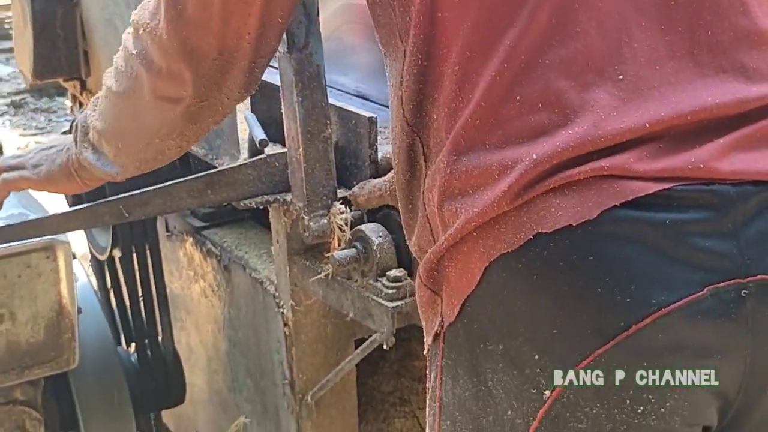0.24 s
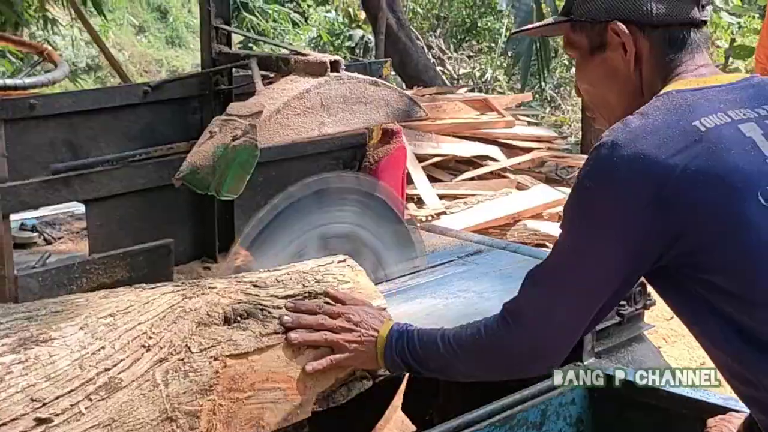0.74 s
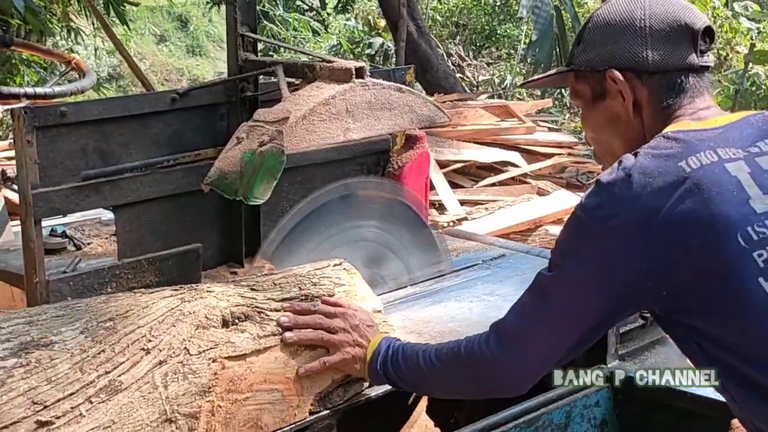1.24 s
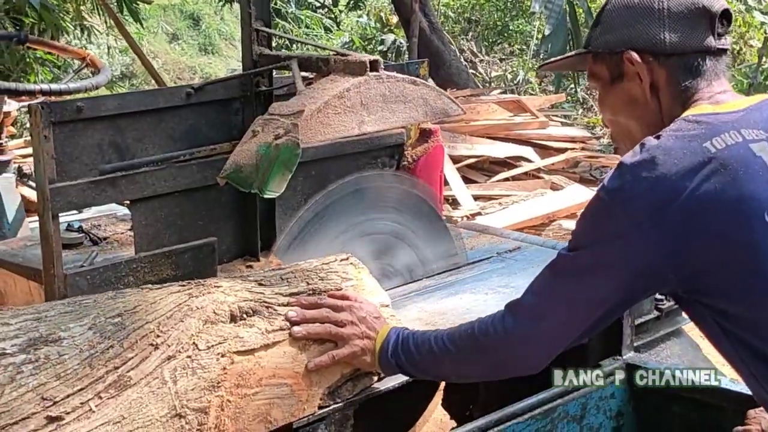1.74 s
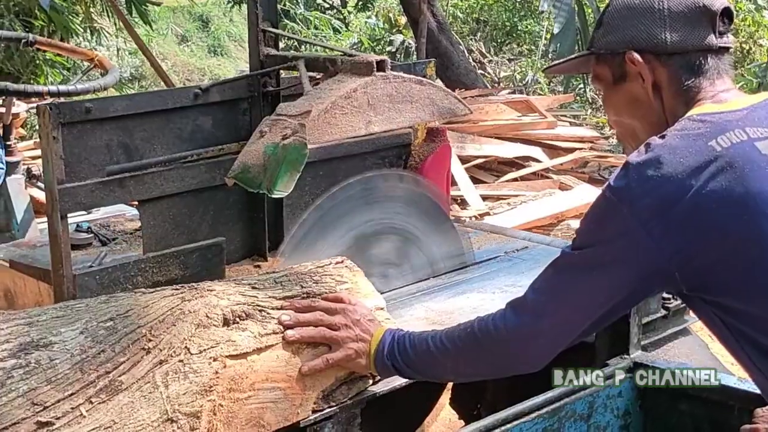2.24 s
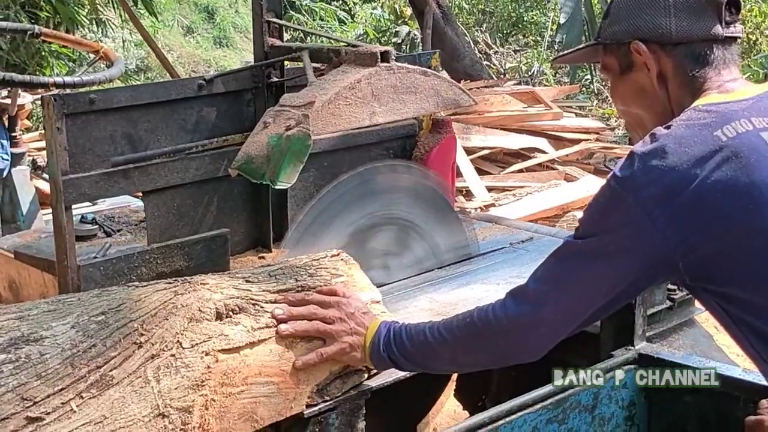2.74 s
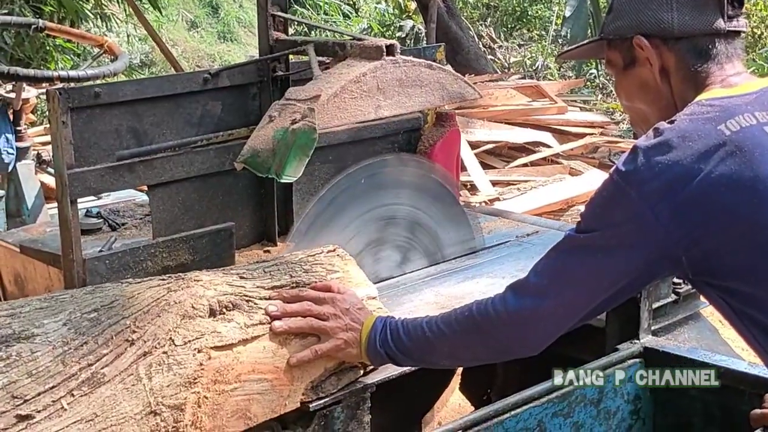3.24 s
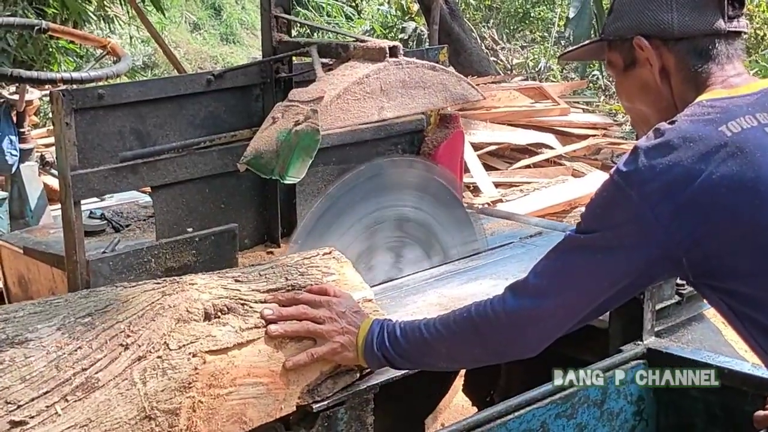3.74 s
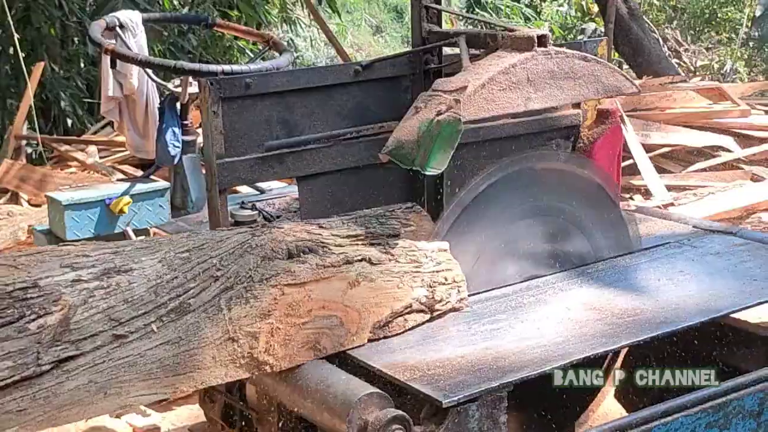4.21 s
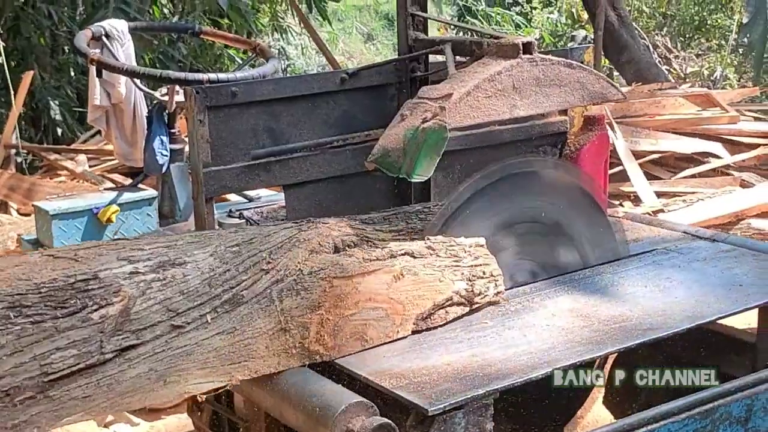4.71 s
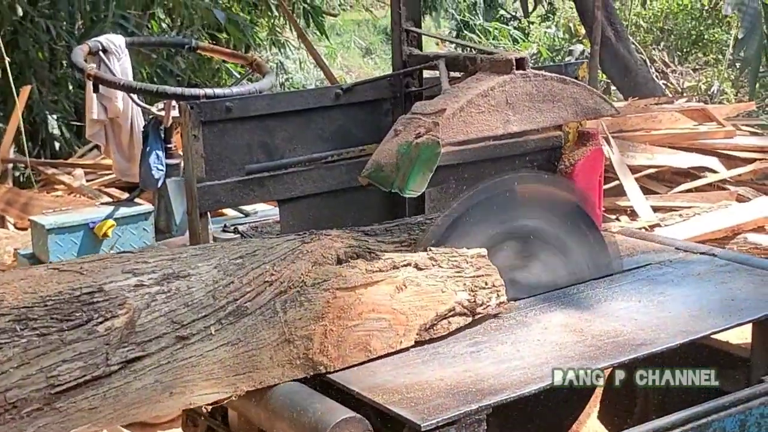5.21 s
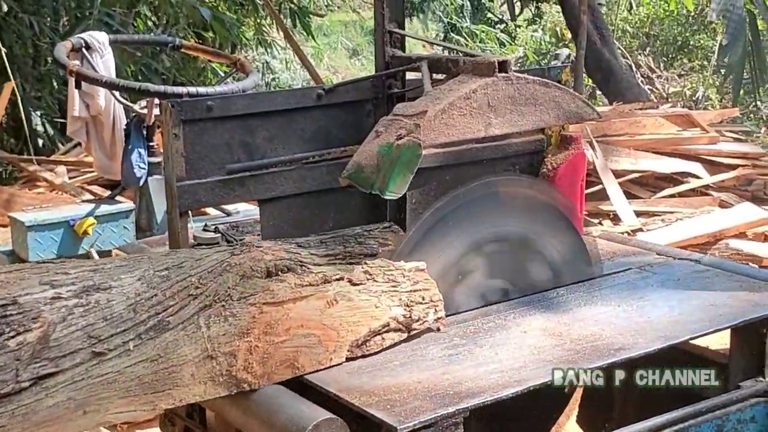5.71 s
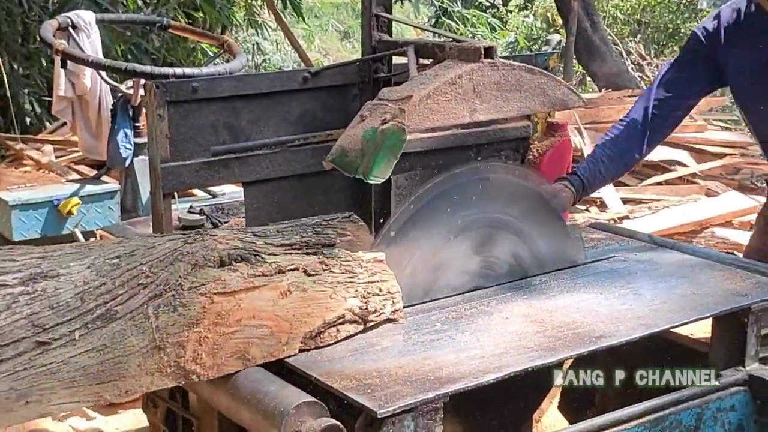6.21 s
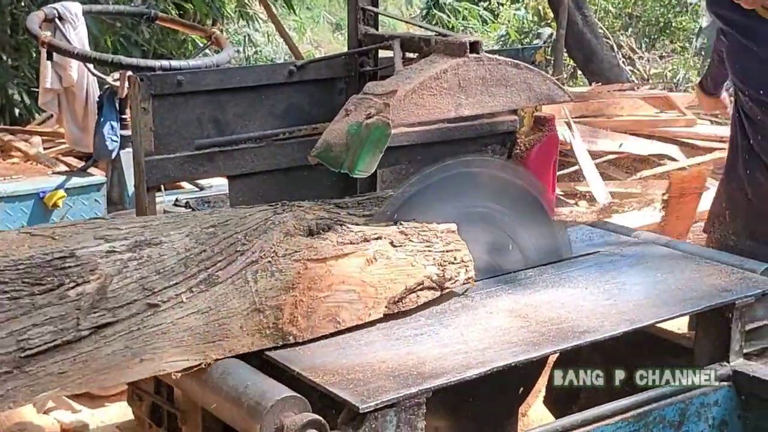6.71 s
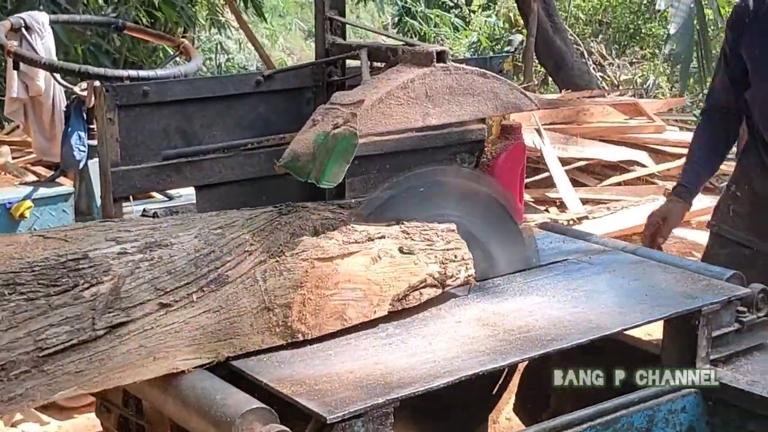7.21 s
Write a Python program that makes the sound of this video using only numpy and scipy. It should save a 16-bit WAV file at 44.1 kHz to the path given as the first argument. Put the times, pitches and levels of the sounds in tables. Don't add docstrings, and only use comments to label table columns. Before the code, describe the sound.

Close outdoors, a single-cylinder diesel pops about fourteen times a second over rumble and clatter, and a slipping belt briefly sings. The microphone backs off as a log meets the blade with a jolt; ripping grows into a bright, coarse rasp. After a jump to a second spot there is more airy hiss, metal knocks and sharp ticks, and the cut weakens before picking up again.

```python
import sys
import numpy as np
from scipy import signal
from scipy.fft import rfft, irfft, dct, next_fast_len
from scipy.io import wavfile
from scipy.ndimage import uniform_filter1d

SR = 44100
rng = np.random.default_rng(int(sys.argv[2]) if len(sys.argv) > 2 else 0)


def invert_db(x):
    u = np.asarray(x, float) / 20
    return 10 ** u


def digitize_waveform(pressure):
    field = np.atleast_2d(pressure).T
    bounded = np.clip(field, -1, 1)
    quanta = np.round(bounded * 32767).astype(np.int16)
    wavfile.write(sys.argv[1], SR, quanta)


N = 328986
HZ = np.fft.rfftfreq(next_fast_len(N), 1 / SR) + 1e-3
MOVE_S = 3.82

# (time [s], fuel effort as pop peak [dB], frame shake [dB])
ENGINE_EFFORT = [(0.0, -11, -28.5), (0.37, -11.5, -27.5), (0.7, -10, -33.5), (0.95, -9.5, -27),
                 (1.08, -17, -36.5), (1.3, -11, -30.5), (1.45, -10.5, -29), (1.7, -18.5, -32.5),
                 (2.38, -13.5, -33.5), (2.5, -13.5, -39), (3.1, -16.5, -41.5), (3.5, -20, -38.5),
                 (3.9, -15.5, -38.5), (4.45, -14.5, -36), (5.1, -11, -35), (6.0, -14, -38),
                 (6.7, -16.5, -34.5), (7.46, -17.5, -38.5)]


def rms_one(x):
    return x / np.sqrt(np.mean(x ** 2) + 1e-20)


def in_time(rows):
    s, *columns = np.transpose(rows)
    return [np.interp(np.arange(N) / SR, s, c) for c in columns]


def at_hz(points):
    hz, value = np.transpose(points)
    return np.interp(np.log(HZ), np.log(np.maximum(hz, 1)), value)


def drift(rate):
    r = np.exp(-80 * np.pi * rate / SR)
    noise = rng.standard_normal(N // 40 + 2002)
    slow = signal.lfilter([1], [1, -2 * r, r * r], noise)[2000:]
    return np.interp(np.arange(N) / 40, np.arange(len(slow)), rms_one(slow))


def grains(per_s, spread_db):
    size = invert_db(spread_db * np.minimum(rng.exponential(1, (2, N)), 4))
    sign = rng.choice([-1, 1], (2, N))
    return size * sign * (rng.random((2, N)) < per_s / SR)


def burst(at_s, heights, hz, spread_s, rise=1):
    t = np.arange(-2000, 2001) / SR
    clicks = np.zeros(N + SR)
    clicks[np.clip(np.round(at_s * SR).astype(int), 0, None)] = heights
    bell = np.exp(-(t / (spread_s * np.where(t < 0, rise, 1))) ** 2)
    return signal.fftconvolve(clicks, np.cos(2 * np.pi * hz * t) * bell, "same")[:N]


def body(drive, spectrum, peaks, patchy_db, patch_rate, lead_s, count):
    # (frequency [Hz], side over mid [dB])
    width_curve = [(30, -34), (85, -31), (180, -28), (350, -19), (700, -14), (1400, -7), (2800, -3),
                   (5600, -1), (9000, -4), (15000, -2.5)]
    # (frequency [Hz], left over right [dB])
    balance_curve = [(300, 0), (600, -.3), (1400, .2), (2800, .5), (5600, .3), (9000, 1), (14000, -1.2)]
    lift_db = sum(db / (1 + (2 * (HZ - hz) / width) ** 2) for hz, width, db in peaks)
    direct, scattered = rfft(drive, next_fast_len(N)) * invert_db(at_hz(spectrum) + lift_db)
    lead = np.exp(1j * np.pi * HZ * lead_s)
    side = scattered * invert_db(at_hz(width_curve))
    sound = np.array([direct * lead + side, direct / lead - side])
    sound = sound * invert_db(at_hz(balance_curve) * [[.5], [-.5]])
    place = np.interp(np.log(HZ), np.log([spectrum[0][0], spectrum[-1][0]]), [0, count - 1])
    out = 0
    for k in range(count):
        share = np.clip(1 - np.abs(place - k), 0, 1)
        band = irfft(sound * share, next_fast_len(N))[:, :N]
        out = out + band * invert_db(patchy_db * drift(patch_rate))
    return out / np.sqrt(np.mean(out.mean(axis=0) ** 2))


def strikes(rows, t60, lag):
    t = np.arange(int(t60 * SR)) / SR
    out = np.zeros(N + SR)
    for (s, db, hz), (detune, phase) in zip(rows, rng.random((len(rows), 2))):
        second_hz = hz * (.94 + .12 * detune)
        pair = np.sin(2 * np.pi * hz * t) + .6 * np.sin(2 * np.pi * (second_hz * t + phase))
        out[int(s * SR):][:len(t)] += invert_db(db - 60 * t / t60) * np.minimum(t / .003, 1) * pair
    return np.array([out[:N], np.roll(out, lag)[:N]])


def after_move():
    return np.clip((np.arange(N) / SR - MOVE_S) / .02, 0, 1)


def recolour(x, change, share):
    other = irfft(rfft(x, next_fast_len(N)) * invert_db(at_hz(change)), next_fast_len(N))[:, :N]
    return x + share * (other - x)


def firings():
    # (firing number, time [s], governor swings so far)
    crank_pace = [(0, -.004, .03), (3, .2154, .41), (18, 1.2913, 6.68), (22, 1.5784, 7.91),
                  (31, 2.2294, 12.66), (34, 2.4452, 13.53), (40, 2.8791, 16.33), (49, 3.5284, 19.67),
                  (54, 3.8753, 20.54), (60, 4.3251, 22.56), (67, 4.8701, 25.78), (68, 4.9429, 27.07),
                  (76, 5.5296, 28.44), (83, 6.0427, 31.82), (85, 6.1778, 32.7), (96, 6.9958, 36.27),
                  (99, 7.2262, 37.72), (102, 7.4557, 38.44)]
    # (firing number, lateness [ms])
    stray_firings = [(3, -4), (5, 5), (6, 4), (11, 6), (16, 3), (17, 3), (20, 2), (32, 2), (34, 3),
                     (57, -2), (77, -4), (82, -4), (92, -4)]
    hunt_s = .00404
    number, s, swings = np.transpose(crank_pace)
    k = np.arange(number[-1] + 1)
    late_ms = sum(ms * (k == stray) for stray, ms in stray_firings)
    hunting = hunt_s * np.cos(2 * np.pi * np.interp(k, number, swings))
    return np.interp(k, number, s) + hunting + late_ms / 1000


def engine():
    # (frequency [Hz], level [dB per Hz])
    rumble_curve = [(12, -39), (20, 3), (65, -1.5), (113, -0.5), (200, 0), (260, -46), (440, -120)]
    # (frequency [Hz], level [dB per Hz])
    boom_curve = [(76, -52), (130, -6), (312, -2.5), (342, -1), (454, -6), (480, -19.5), (620, -33),
                  (1060, -120)]
    # (frequency [Hz], level [dB per Hz])
    clatter_curve = [(260, -27.5), (450, 9.5), (621, -5), (704, -1.5), (1020, -7.5), (1320, -7.5),
                     (1500, -13), (2640, -13.5), (3680, -11), (5690, -21), (7000, -36), (9100, -51),
                     (15400, -120)]
    # (frequency [Hz], width [Hz], lift [dB])
    casing_modes = [(73, 12, 3), (249, 14, 7), (323, 14, 6), (709, 60, 2), (1313, 50, 5), (1658, 45, 5)]
    effort_db, rumble_db = in_time(ENGINE_EFFORT)
    swing_db = effort_db + 12
    boom_db = -30 + 0.99 * swing_db + 2 * after_move()
    clatter_db = -26.5 + 0.6 * swing_db + 1.06 * after_move()
    s = firings()

    compression = burst(s - .016, invert_db(rng.normal(0, 1.0, len(s))), hz=74.3, spread_s=0.011)
    rock_back = burst(s - .0025, .5, hz=74.0, spread_s=0.012)
    push = rms_one(compression + rock_back)

    swell = 1.7 + burst(s - .016, 1.0, hz=0, spread_s=0.069) + burst(s + 0.025, 0.04, hz=0, spread_s=0.0026)
    rumble = body(rng.standard_normal((2, N)) * swell, rumble_curve, casing_modes,
                  patchy_db=4.5, patch_rate=0.25, lead_s=0, count=2)

    lull = 1 - 0.15 * burst(s + 0.0021, 1.0, hz=0, spread_s=0.004)
    boom = lull * body(grains(900, 1.4), boom_curve, casing_modes,
                       patchy_db=0.5, patch_rate=8.3, lead_s=0, count=2)

    knock = 1 + burst(s, .3, hz=0, spread_s=.003) + burst(s + .038, .5, hz=0, spread_s=.004)
    clatter = body(grains(5000, 2.1) * knock, clatter_curve, casing_modes,
                   patchy_db=0.57, patch_rate=11.0, lead_s=0, count=6)

    low = invert_db(-2.5) * push + invert_db(-2.5) * rumble
    return invert_db(rumble_db) * low + invert_db(boom_db + 2.0) * boom + invert_db(clatter_db + 3.5) * clatter


def exhaust():
    # (time [s], loss [dB])
    lean_firings = [(0.0, -1), (1.008, 4), (1.368, 6), (1.504, 9), (1.648, 4), (2.307, 3), (2.732, 2),
                    (2.95, 3), (3.39, 4), (3.529, 9), (4.026, 3), (4.32, 6), (4.564, 6), (4.716, 5),
                    (4.79, 3), (4.871, 8), (4.945, 8), (5.156, 3), (5.237, 3), (5.317, 8), (5.527, 11),
                    (5.673, 3), (5.967, -3), (6.48, 6), (6.55, 8), (6.845, 9), (6.924, 5), (7.075, 10)]
    s = firings()
    db = np.interp(s, *np.transpose(ENGINE_EFFORT)[:2])
    db = db + rng.normal(0, 1.0, len(s)) + 1.2 * (s > MOVE_S)
    for lean_s, loss_db in lean_firings:
        db[np.argmin(np.abs(s - lean_s))] -= loss_db
    pop = burst(s, invert_db(db - 2.3), hz=283, spread_s=.0042, rise=.82)
    back = burst(s + .0183, -invert_db(db - 9.5), hz=170, spread_s=.0018)
    return pop + back


def bench():
    # (time [s], pitch [Hz], level [dB])
    belt_song = [
        (.05, 722, -38),
        (.14, 728, -32),
        (.25, 735, -26.5),
        (.34, 718, -30),
        (.48, 667, -38),
        (.55, 670, -44),
    ]
    # (frequency [Hz], level [dB], t60 [s])
    bench_modes = [(700, -21, 0.25), (1330, -23.5, 0.2), (2070, -24, .1), (4950, -27, 0.044)]
    # (time [s], peak [dB], pitch [Hz])
    pipe_rings = [(0.067, -12, 249), (0.137, -16, 294), (0.206, -15, 299), (0.282, -14, 305),
                  (0.36, -21, 260), (0.428, -16, 258), (0.501, -14, 245), (0.644, -12.5, 256),
                  (0.712, -14, 335), (0.854, -12, 250), (0.924, -12, 246), (1.149, -18, 245),
                  (1.286, -16, 250), (2.011, -13, 288), (2.438, -16, 302), (2.516, -14, 255),
                  (2.725, -20, 248), (3.087, -22, 258), (3.234, -19, 293), (3.736, -21, 293),
                  (4.246, -16, 247), (4.399, -17, 283), (4.475, -17, 310), (5.084, -13, 326),
                  (5.383, -12, 256), (5.817, -21, 251), (5.894, -13, 328), (5.961, -17, 248),
                  (6.04, -13, 324), (6.171, -18, 258), (6.25, -15.5, 247), (6.316, -11, 253),
                  (6.395, -20, 310), (6.615, -14, 276), (7.221, -20, 277), (7.305, -18, 285)]
    # (time [s], peak [dB], pitch [Hz])
    metal_knocks = [(0.139, -20, 732), (0.544, -23, 891), (0.609, -21, 700), (0.682, -21.5, 910),
                    (0.768, -20.5, 710), (0.905, -24.5, 735), (0.979, -19, 1316), (1.564, -12.5, 720),
                    (1.629, -16, 1100), (2.043, -21, 686), (2.33, -14, 767), (2.472, -21, 686),
                    (4.133, -16, 869), (4.5, -12, 740), (4.575, -20, 730), (4.668, -13, 773),
                    (4.742, -20, 735), (4.823, -18, 772), (4.892, -14, 732), (5.001, -22.5, 866),
                    (5.122, -15, 774), (5.226, -18, 710), (5.272, -14, 716), (5.491, -13, 726),
                    (5.559, -24, 715), (5.92, -24, 890), (6.026, -10, 699), (6.346, -16, 680),
                    (6.88, -25, 1043), (7.1, -19, 775)]
    # (time [s], peak [dB], pitch [Hz])
    tooth_ticks = [(0.0707, -17, 3000), (0.2828, -10, 3610), (0.3257, -14, 3700), (0.4908, -19, 3630),
                   (0.5496, -13, 4300), (0.7741, -15, 3660), (0.9777, -10, 3400), (1.023, -2, 4450),
                   (1.1233, -15, 3870), (1.1977, -21, 3540), (1.4132, -19, 3400), (2.5463, -11, 4080),
                   (3.5184, -6, 3320), (3.678, -15, 4000), (4.2098, -3, 3970), (4.4657, -12, 4100),
                   (4.6937, -11, 4030), (4.7157, -17, 3990), (4.8234, -24, 3700), (4.8609, -18, 4090),
                   (4.9931, -18, 3880), (5.0634, -14, 4020), (5.2934, -17, 3870), (5.6466, -14, 4430),
                   (5.7867, -11, 3450), (5.8167, -13, 4260), (5.9224, -24, 3400), (6.2442, -14, 3930),
                   (6.3699, -17, 4180), (6.6094, -7, 4240), (6.8937, -7, 4200), (6.9691, -2, 3700),
                   (7.1232, -17, 4120), (7.2305, -15, 4010), (7.2644, -2, 3930)]
    jolt_s = .98
    t = np.arange(N) / SR
    hz, db = in_time(belt_song)
    slipping = (t > belt_song[0][0]) & (t < belt_song[-1][0])
    belt = invert_db(db - 1 + 1.8 * drift(18.0)) * np.sin(2 * np.pi * np.cumsum(hz) / SR) * slipping
    jolt = sum(strikes([(jolt_s, db, hz)], t60, lag=0) for hz, db, t60 in bench_modes)
    pipe = invert_db(-9) * strikes(pipe_rings, t60=.2, lag=0)
    metal = invert_db(-6) * strikes(metal_knocks, t60=0.068, lag=1)
    ticks = invert_db(-9) * strikes(tooth_ticks, t60=0.029, lag=-2)
    return belt + jolt + pipe + metal + ticks


def dust():
    # (time [s], length [s], level [dB])
    sawdust_sprays = [
        (0.0, .33, -56),
        (1.0, .08, -55),
        (3.3, .5, -56),
        (3.81, .25, -39),
        (4.03, .6, -37),
        (5.4, .45, -47),
        (6.0, .3, -46),
        (6.33, .08, -36),
        (6.36, 1.1, -38),
    ]
    rise_s, fade_s = 0.012, 0.14
    t = np.arange(N) / SR
    power = invert_db(-56 + 9.5 * after_move() + 1.2 * drift(19.0)) ** 2
    gusts = invert_db(1.5 * drift(12.0))
    for s, length, db in sawdust_sprays:
        shape = np.clip((t - s) / rise_s, 0, 1) * np.exp(-np.clip(t - s - length, 0, None) / fade_s)
        power = power + (invert_db(db) * shape) ** 2
    return np.sqrt(power) * gusts


def knots():
    # (time [s], length [s], lift [dB])
    hard_knots = [(0.32, 0.03, 5.5), (0.543, 0.04, 8), (0.591, 0.04, 4.5), (0.769, 0.049, 4.5),
                  (0.982, 0.13, 3), (1.064, 0.0083, 6), (1.12, 0.028, 3), (1.471, 0.027, 5),
                  (1.618, 0.027, -1.5), (2.062, 0.048, 0.5), (2.284, 0.057, -0.5), (2.585, 0.1, 1),
                  (2.805, 0.028, 0.5), (3.064, 0.13, 1.5), (3.268, 0.015, 1), (3.865, 0.15, 0),
                  (4.201, 0.043, -2), (4.572, 0.036, 3), (4.731, 0.032, 4.5), (4.819, 0.012, 5.5),
                  (5.064, 0.013, 8), (5.211, 0.014, 5.5), (5.436, 0.065, 3), (5.78, 0.096, 3),
                  (6.215, 0.053, 0), (6.326, 0.051, 3.5), (6.706, 0.031, 3), (6.781, 0.052, 4),
                  (7.251, 0.028, 0.5)]
    # (time [s], length [s], lift [dB])
    bark_snag = (1.023, 0.011, 5.6)
    # (time [s], length [s], loss [dB])
    soft_pockets = [(1.784, 0.081, 1.5), (2.26, 0.019, 4), (2.424, .023, 3), (2.688, 0.048, 0.5),
                    (3.728, 0.066, 2), (4.05, 0.03, 2.5), (4.7, 0.014, 4), (4.956, .029, 9),
                    (5.035, 0.035, 10), (5.337, 0.027, 2), (5.404, 0.025, 7), (5.895, 0.038, -0.5),
                    (6.053, .018, 1), (6.418, 0.071, 2.5), (7.083, 0.078, 0), (7.377, 0.029, 5)]
    t = np.arange(N) / SR
    rows = list(hard_knots) + [bark_snag] + [(s, length, -db) for s, length, db in soft_pockets]
    load_db = sum(db * ((t >= s) & (t < s + length)) for s, length, db in rows)
    return uniform_filter1d(load_db, size=220)


def saw():
    # (time [s], cutting level [dB])
    log_feed = [(0.0, -33.5), (0.972, -33), (0.984, -26.5), (1.2, -29.5), (1.35, -31.5), (1.62, -21.5),
                (1.83, -25), (2.1, -24), (2.5, -26), (2.7, -24), (3.4, -22.5), (3.76, -25), (4.57, -27.5),
                (4.94, -30.5), (5.8, -26), (5.92, -30.5), (6.4, -24.5), (7.46, -25.5)]
    # (frequency [Hz], level [dB per Hz])
    cut_curve = [(1000, -8.5), (1700, -5), (2060, -4.5), (2630, -5), (2900, -4.5), (4020, 3), (5050, -3.5),
                 (5350, -8), (6220, -12), (6700, -13), (8130, -21), (10000, -21.5), (13000, -62),
                 (22000, -120)]
    # (frequency [Hz], width [Hz], lift [dB])
    blade_modes = [(2018, 50, 3), (2245, 120, 3), (2508, 55, 5), (2806, 55, 5), (3008, 45, 5),
                   (3370, 70, 3), (3590, 60, 4), (3718, 40, 3), (4033, 40, 3), (4484, 60, 4), (4820, 80, 5),
                   (5846, 70, 8), (6913, 100, 3), (7664, 100, 4)]
    # (frequency [Hz], level [dB per Hz])
    hiss_curve = [(3820, -5.5), (6500, -2.5), (6860, -16), (7300, -3), (7910, -18.5), (9350, -10.5),
                  (11400, -14), (13300, -13), (14300, -13), (15500, -20.5)]
    cut_db, = in_time(log_feed)
    bite = invert_db(0.57 * drift(54.0) + 0.44 * drift(20.0))
    cut = body(grains(14000, 1.8) * bite, cut_curve, blade_modes,
               patchy_db=-0.86, patch_rate=10.0, lead_s=2.6e-5, count=5)
    hiss = body(rng.standard_normal((2, N)), hiss_curve, [],
                patchy_db=.5, patch_rate=24.0, lead_s=0, count=5)
    return invert_db(cut_db + knots() - 0.36) * cut + invert_db(3.5) * dust() * hiss


def scene():
    # (frequency [Hz], colour change [dB])
    belt_spot = [(40, -6), (72, -8), (120, 8.5), (190, -4.5), (280, -1), (4000, 0), (6200, 4.5),
                 (9000, 1.5)]
    # (frequency [Hz], colour change [dB])
    shaded_rim = [(120, -2.5), (190, 2), (300, 0), (5500, 1), (7200, -6.5), (9000, -3), (11000, 4.5),
                  (14000, -2.5)]
    # (frequency [Hz], colour change [dB])
    later_spot = [(60, 1), (190, 1), (280, -0.5), (465, 3), (620, -2), (830, 1), (1050, 0), (1330, -2),
                  (1490, -4), (1750, 0.5), (3000, -2), (4500, 0), (7000, 2.5), (9500, -2), (11500, 2),
                  (13500, -5), (15000, 0.5)]
    leave_s, shade_s = .35, 5.99
    t = np.arange(N) / SR
    pops = exhaust()
    pops = np.array([pops, np.roll(pops, 1)])
    here = engine() + saw() + bench() + pops
    here = recolour(here, belt_spot, np.clip((leave_s - t) / .01, 0, 1))
    here = recolour(here, shaded_rim, np.clip((t - shade_s) / 0.2, 0, 1))
    return recolour(here, later_spot, after_move())


def patchy_grain(x):
    # (frequency [Hz], patch depth [dB], mid rms over mid step [dB], mid rms over side step
    # [dB])
    grain_fineness = [(100, 0, 28, 25), (350, 2, 27, 22), (480, 6, 27, 22), (800, 4, 21, 13),
                      (1500, 6, 19, 16), (2600, 6, 18, 15), (3800, 5, 20, 19), (4900, 6, 19, 18),
                      (5800, 12, 12, 11), (7300, 14, -3, -6), (10000, 9, -5, -8), (11000, 7, -8, -10),
                      (15000, 6, -8, -10)]
    # (frequency [Hz], width [Hz], depth [dB])
    weak_slots = [(468, 135, -18), (1790, 60, -5), (2620, 140, -4), (3470, 40, -5), (3655, 40, -5),
                  (4720, 90, -6), (5580, 90, -8), (6110, 80, -10), (6240, 80, -6), (7330, 130, -11),
                  (8250, 250, -11), (9250, 150, -5), (10300, 400, -6), (13200, 400, -4)]
    # (bands per factor e in pitch, frames of 23 ms)
    patch_size = (38, 3)
    hop, pad = 1024, 2048 - 617
    window = signal.windows.kaiser_bessel_derived(2 * hop, 4 * np.pi)
    mid_side = np.pad([x[0] + x[1], x[0] - x[1]], ((0, 0), (pad, 2 * hop))) / 2
    frames = np.lib.stride_tricks.sliding_window_view(mid_side, 2 * hop, axis=1)[:, ::hop] * window
    a, b, c, d = np.split(frames, 4, axis=2)
    folded = np.dstack([-c[..., ::-1] - d, a - b[..., ::-1]])
    cells = dct(folded, type=4, norm="ortho")

    hz = (np.arange(hop) + .5) * SR / 2 / hop
    at, depth_db, *fine_db = np.transpose(grain_fineness)
    band_of = (np.log(hz) * patch_size[0]).astype(int)
    chance = rng.standard_normal(cells.shape[1:])[:, band_of]
    chance = rms_one(uniform_filter1d(chance, size=patch_size[1], axis=0))
    gaps_db = sum(db / (1 + (2 * (hz - centre) / width) ** 4) for centre, width, db in weak_slots)
    depth = np.interp(hz, at, depth_db)
    patch = invert_db(depth * np.minimum(chance, .6))
    cells = cells * patch / np.sqrt(np.mean(patch ** 2, axis=0)) * invert_db(gaps_db)

    power = uniform_filter1d(cells[0] ** 2, size=48, axis=1)
    power = np.abs(uniform_filter1d(power, size=5, axis=0)) + 1e-14
    step = power ** .34 * power.mean(axis=0) ** .16
    step = step * invert_db([[-np.interp(hz, at, db)] for db in fine_db])
    rounded = np.round(cells / step) * step

    first, second = np.split(dct(rounded, type=4, norm="ortho"), 2, axis=2)
    frames = np.dstack([second, -second[..., ::-1], -first[..., ::-1], -first]) * window
    lapped = (frames[:, 1:, :hop] + frames[:, :-1, hop:]).reshape(2, -1)
    mid, side = lapped[:, pad - hop:pad - hop + N]
    return np.array([mid + side, mid - side])


def low_pass(x):
    return signal.sosfilt(signal.butter(12, 15660, fs=SR, output="sos"), x)


def record(dry):
    rounded_peaks = 1.2 * np.tanh(dry / 1.2)
    mix = patchy_grain(rounded_peaks)
    return low_pass(mix)


dry = scene()
out = record(dry)
digitize_waveform(out)
```